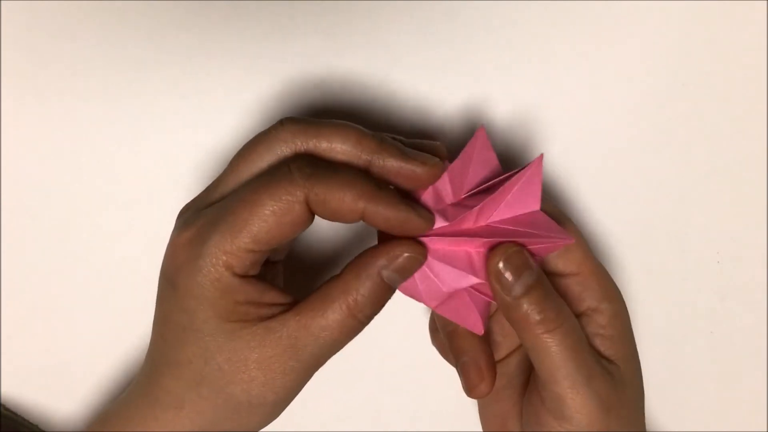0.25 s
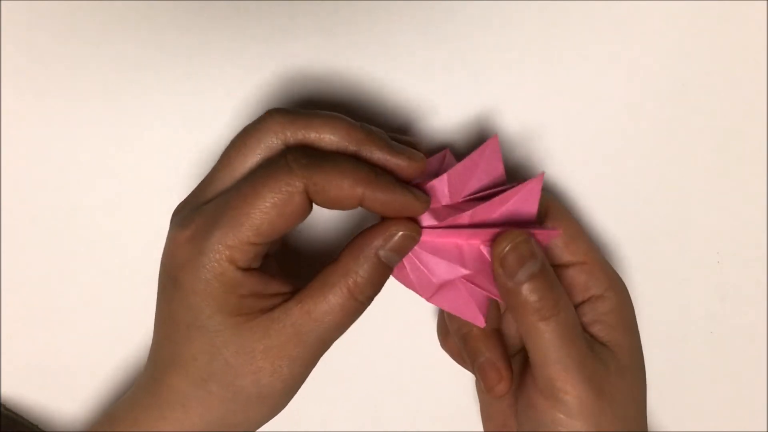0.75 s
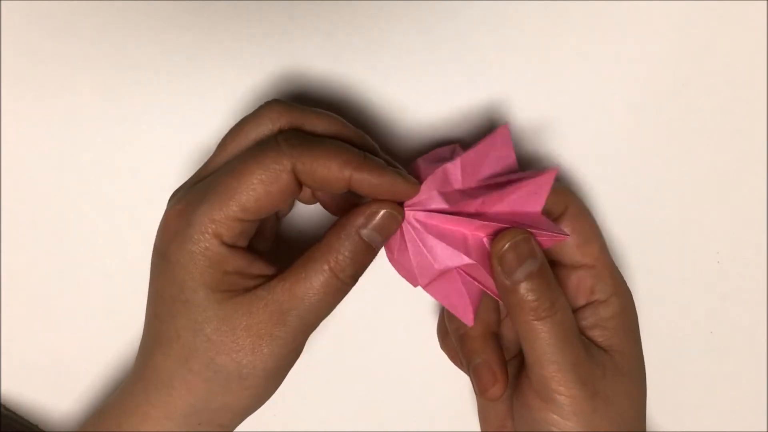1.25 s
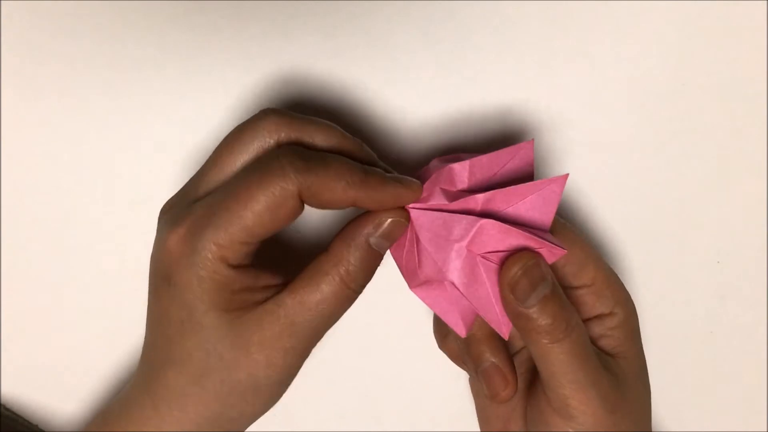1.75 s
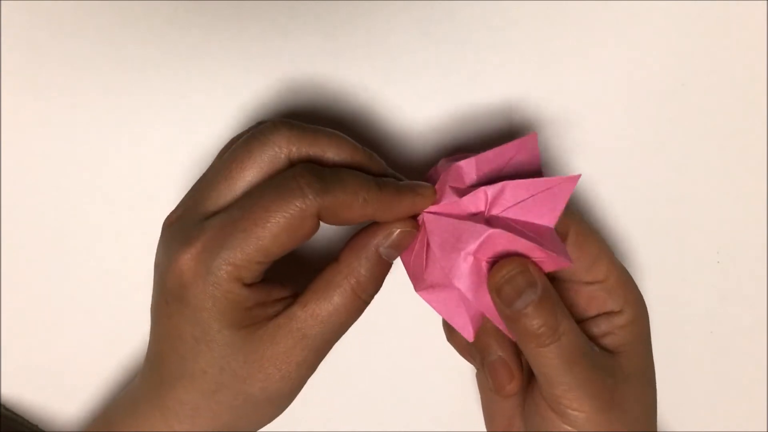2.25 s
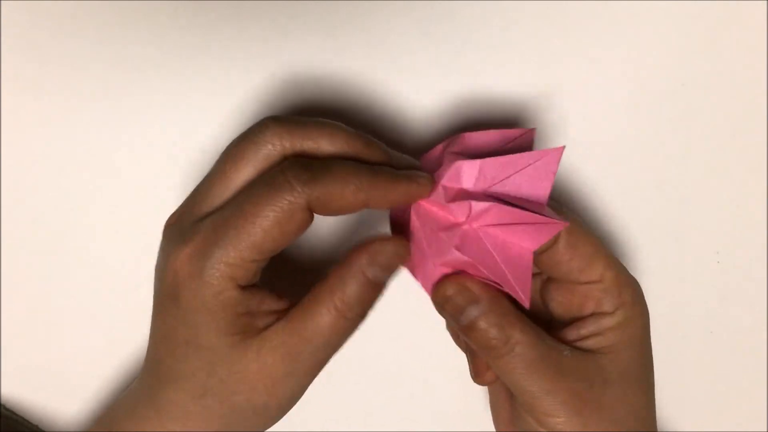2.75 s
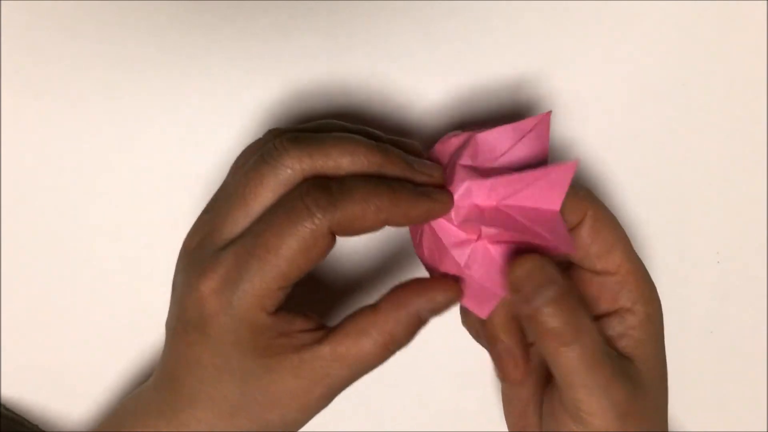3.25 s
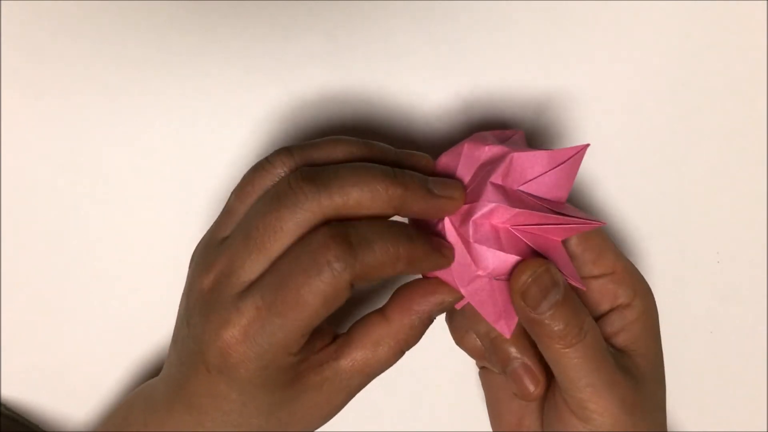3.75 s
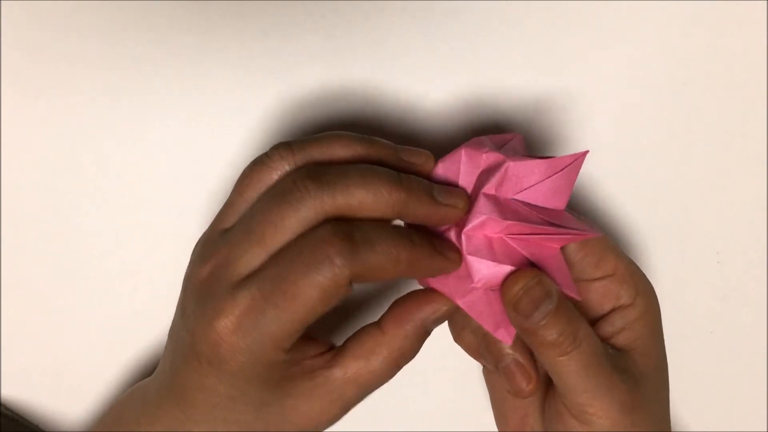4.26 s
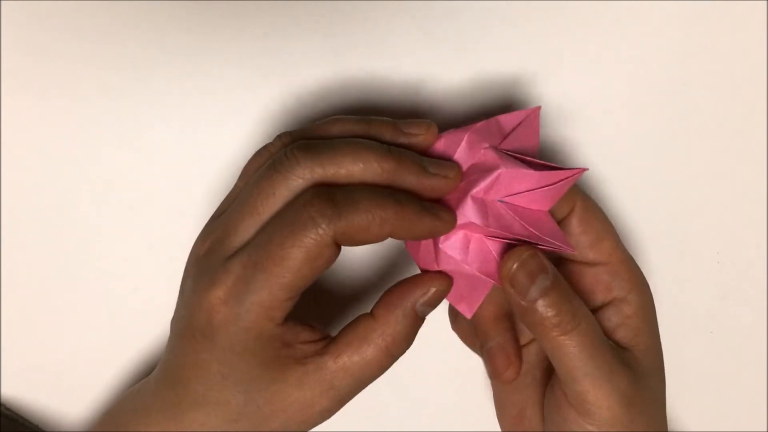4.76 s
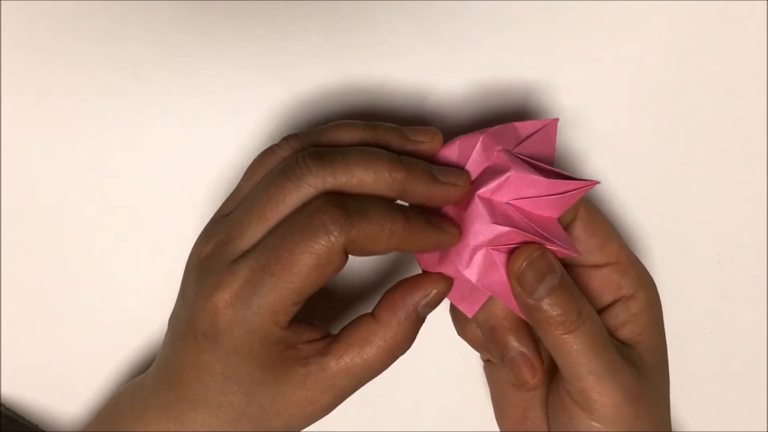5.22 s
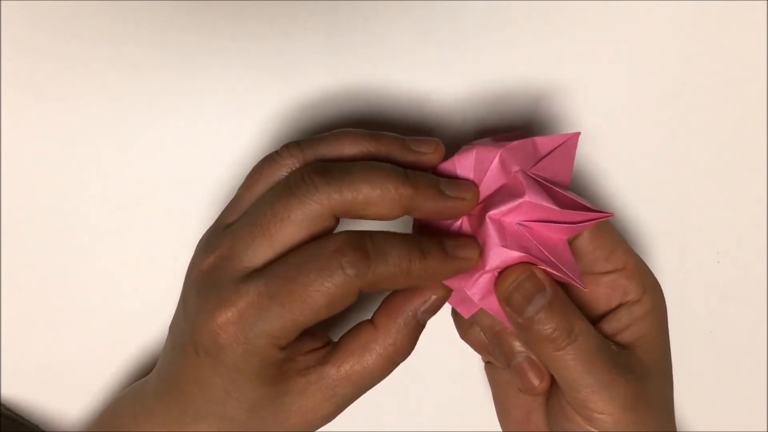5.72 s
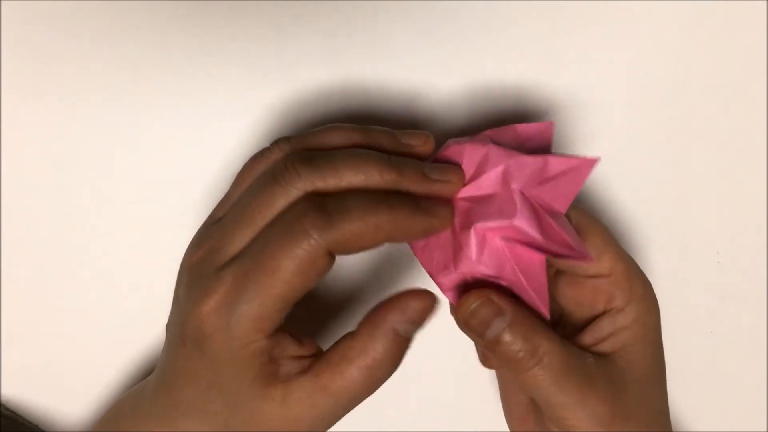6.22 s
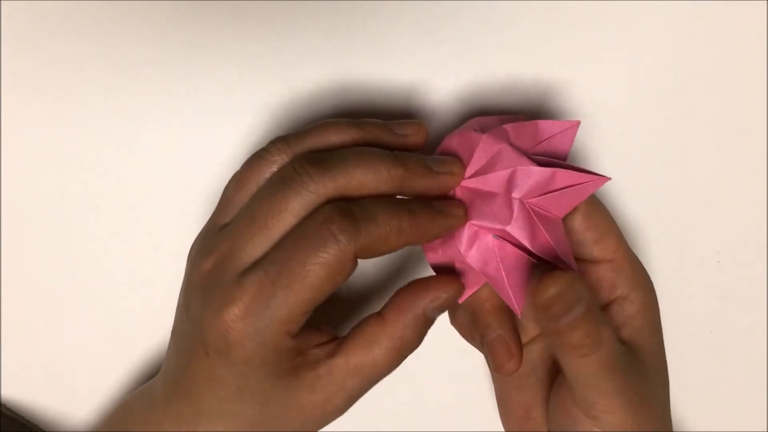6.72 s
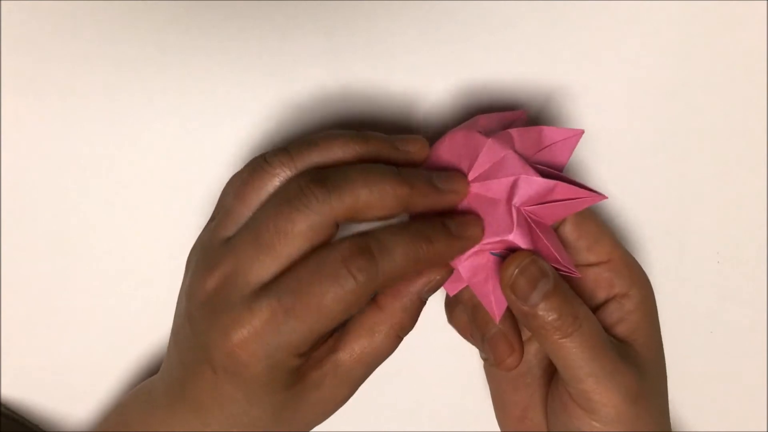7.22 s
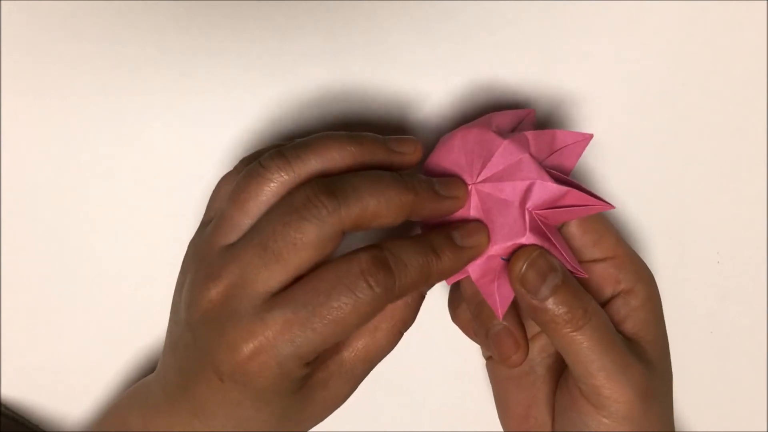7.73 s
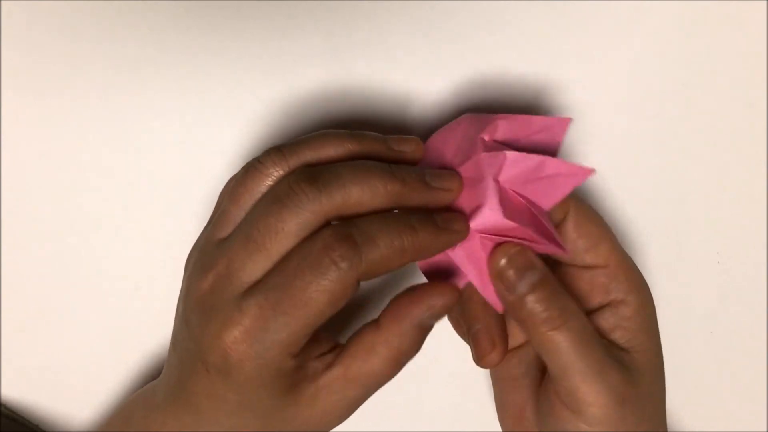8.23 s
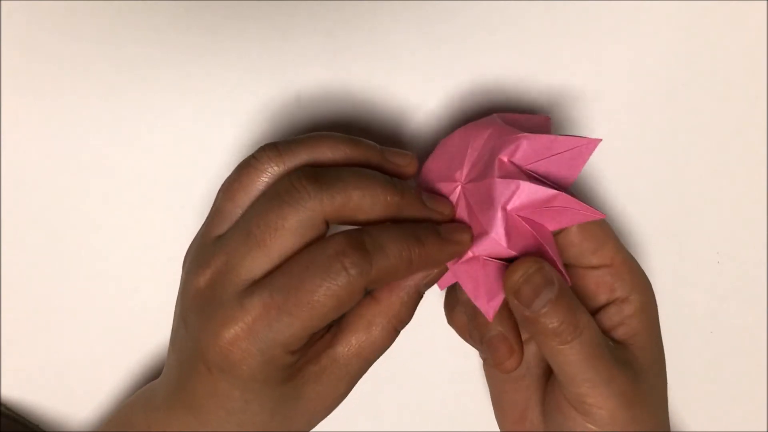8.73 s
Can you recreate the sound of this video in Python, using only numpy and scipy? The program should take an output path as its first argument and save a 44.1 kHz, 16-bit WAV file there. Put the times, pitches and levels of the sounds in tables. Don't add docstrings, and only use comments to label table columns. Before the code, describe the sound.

Crisp paper crackling and short grainy rubs as hands work a little stiff origami piece indoors, over very faint room air and hiss.

```python
import sys
import numpy as np
from scipy import signal
from scipy.fft import rfft, irfft, next_fast_len
from scipy.io import wavfile
from scipy.ndimage import uniform_filter1d, map_coordinates

SR = 44100
rng = np.random.default_rng(int(sys.argv[2]) if len(sys.argv) > 2 else 0)


def inscribe(sig):
    pcm = np.round(np.clip(np.atleast_2d(sig).T, -1, 1) * 32767)
    wavfile.write(sys.argv[1], SR, pcm.astype(np.int16))


def undo_db(level):
    steps = np.asarray(level, float) / 20
    return 10 ** steps


N = 396018

# pitch_hz, width_hz, level_db
FLAP_TONES = [(2176, 245, 8.5), (2706, 480, 3.5)]


def unit(x):
    return x / np.sqrt(np.mean(x ** 2) + 1e-20)


def peak_one(rows):
    return rows / np.abs(rows).max(axis=1, keepdims=True)


def along(points, hz):
    f, v = np.transpose(points)
    return np.interp(np.log(hz + 1), np.log(f + 1), v)


def filtered(x, response):
    m = next_fast_len(N + SR // 4)
    hz = np.fft.rfftfreq(m, 1 / SR)
    return irfft(rfft(x, m) * response(hz), m)[..., :N]


def resonances(modes):
    def one(f, centre, width):
        return 1j * f * width / (centre * centre - f * f + 1j * f * width)

    def response(f):
        total = 0
        for k, (centre, width, db) in enumerate(modes):
            total = total + (-1) ** k * undo_db(db) * one(f, centre, width) * one(f, centre, 3 * width)
        return total

    return response


def wobble(rate):
    points = rng.standard_normal(int(N * rate / SR) + 4)
    return map_coordinates(points, [np.arange(N) * rate / SR])


def creases():
    # start_s, pocket_pitch_hz, pocket_db, flap_db, crack_db
    loose_snaps = [(0.3385, 1085, -17, -19, -33), (1.0895, 1060, -29.5, -37, -26.5),
                   (1.337, 1150, -38, -50, -23.5), (1.3615, 1000, -52, -31.5, -53),
                   (1.7378, 1090, -32.5, -25.5, -39), (1.7573, 1580, -31, -22, -66),
                   (2.534, 1600, -51, -34, -32), (3.0688, 1395, -25.5, -21.5, -33.5),
                   (3.2317, 746, -33.5, -64, -62), (3.4534, 1170, -33, -24.5, -23),
                   (4.0537, 1670, -42, -33.5, -33.5), (4.7937, 800, -42, -33, -37),
                   (4.9109, 1020, -51, -37, -30), (5.1217, 1220, -32, -31.5, -31.5),
                   (5.6218, 700, -25.5, -68, -55), (8.1645, 1150, -34.5, -22.5, -22.5),
                   (8.6369, 1830, -65, -23, -20), (8.9346, 1590, -47, -40, -31.5)]
    # start_s, pocket_pitch_hz, pocket_db, flap_db, crack_db
    tight_snaps = [
        (2.2003, 1317, -22.5, -12.5, -13),
        (3.0104, 1240, -49, -29, -31),
        (6.3074, 944, -32, -30, -28.5),
        (6.4063, 918, -21, -14.5, -11),
        (7.8026, 1160, -25, -29.5, -20.5),
        (8.1187, 990, -29.5, -47, -26.5),
    ]
    # start_s, level_db
    dents = [(.2087, -49), (.4486, -44), (1.1118, -35), (1.3444, -39), (1.419, -35.5), (1.8198, -37),
             (2.4015, -38), (3.2415, -40), (3.2495, -41), (3.5357, -49), (3.7916, -39.5), (4.5744, -41),
             (4.6086, -45.5), (4.6753, -42), (5.2847, -44), (6.477, -44), (6.4905, -39), (6.5983, -45.5),
             (6.9779, -43), (7.2982, -44.5), (7.3197, -50.5), (8.2143, -48.5), (8.6209, -47.5),
             (8.9041, -39.5)]
    # start_s, level_db
    flicks = [(.5687, -42), (.5871, -51), (.6117, -38), (.621, -44), (1.2483, -36.5), (2.2125, -40),
              (2.3743, -38), (2.3895, -41), (2.647, -43.5), (3.479, -30), (3.7819, -29.5), (4.0684, -36),
              (4.1279, -41), (5.2517, -33.5), (5.2689, -38), (6.063, -32), (6.4237, -35), (6.4985, -28.5),
              (7.3912, -43), (7.4373, -44), (7.5491, -48), (8.0505, -42), (8.6499, -48)]
    # start_s, level_db
    splits = [(.4816, -36), (1.4737, -42.5), (1.4919, -33.5), (2.1914, -36), (3.0184, -33), (3.6627, -46.5),
              (4.862, -34.5), (5.101, -29.5), (5.5876, -39.5), (6.095, -34.5), (6.1063, -27), (6.6669, -58),
              (7.0028, -33), (7.064, -39), (7.1278, -32), (8.6012, -38)]
    kinds = [(dents, 1036, 1, -5.5, -17), (flicks, 1313, -11.5, -3.5, -10.5),
             (splits, 1161, -15, -10, -2.5)]
    ticks = np.array([(s, hz, db + pocket_db, db + flap_db, db + crack_db)
                      for rows, hz, pocket_db, flap_db, crack_db in kinds for s, db in rows])
    ticks[:, 1] *= np.exp(.15 * rng.standard_normal(len(ticks)))
    rows = np.vstack([tight_snaps, loose_snaps, ticks])
    tight = np.arange(len(rows)) < len(tight_snaps)
    return np.c_[rows, tight]


def snaps():
    # pitch_hz, level_db
    crack_tone = [(2500, -16.5), (3500, 5), (4500, 9), (5100, -2), (6200, 5.5), (8500, -4.5), (12000, -11),
                  (16000, -15.5)]
    s, pocket_hz, pocket_db, flap_db, crack_db, tight = creases().T[:, :, None]
    octaves = np.where(tight, .33, -.35 * np.log2(pocket_hz / 1200))
    crack_hz = 5100 * 2 ** octaves
    t = np.arange(SR // 50) / SR
    chance = rng.standard_normal((len(s), 4 + len(t)))

    def ring(hz, t60):
        return np.sin(2 * np.pi * hz * t) * undo_db(-60 * t / t60) * (1 - np.exp(-t / .0002))

    pocket = peak_one(ring(pocket_hz, .013) + .7 * ring(1.42 * pocket_hz, .009))

    bending = 0
    for k, (hz, _, db) in enumerate(FLAP_TONES):
        strength = undo_db(db + 3 * chance[:, [k]])
        bending = bending + strength * ring(hz * (1 + .05 * chance[:, [k + 2]]), .007)
    flaps = peak_one(np.gradient(bending, axis=1))

    first_break = 3.2 * (np.arange(len(t)) == 8)
    tear = (chance[:, 4:] + first_break) * undo_db(-60 * t / .006) * (1 - np.exp(-t / .0001))
    hz = np.fft.rfftfreq(len(t), 1 / SR)
    tilt_db = 20 * np.log2(crack_hz / 5600) * np.log2(hz / 5600 + .01)
    colour = undo_db(along(crack_tone, hz) + tilt_db * (hz > 3000))
    crack = peak_one(irfft(rfft(tear) * colour, len(t)) * (t < .01))

    rows = undo_db(pocket_db + 0.5) * pocket + undo_db(flap_db - 0.5) * flaps + undo_db(crack_db - 0.5) * crack
    at = np.round(s * SR).astype(int) + np.arange(len(t))
    return np.bincount(at.ravel(), rows.ravel(), N + SR)[:N]


def patchy(x, patchy_db):
    z = signal.stft(x, nperseg=512)[2]

    def patches(pitch_bins, steps):
        spread = uniform_filter1d(rng.standard_normal(z.shape), pitch_bins, axis=0)
        return unit(uniform_filter1d(spread, steps, axis=1))

    gain = undo_db(patchy_db * (patches(3, 14) + patches(20, 10)))
    return signal.istft(z * gain, nperseg=512)[1][:N]


def slides(t):
    # start_s, length_s, drag_db, pocket_db, fibre_db
    held_slides = [
        (.482, 0.074, -54, -5.5, 6),
        (0.537, 0.1, -53.5, -8, -6.5),
        (1.315, 0.044, -48, 1.5, 2.5),
        (3.169, 0.071, -61.5, -4.5, -2.5),
        (3.227, 0.033, -64, 9.5, -14),
        (3.346, 0.042, -52, -3, 0),
        (4.42, 0.04, -54.5, 6, 4.5),
        (5.684, 0.043, -50, -6, 0),
        (5.757, 0.023, -50.5, -2.5, -6.5),
        (8.6, 0.024, -61.5, 1.5, 0),
    ]
    on_s, off_s, sag_db = .005, .008, 2.5
    s, length, drag_db, pocket_db, fibre_db = np.transpose(held_slides)[:, :, None]
    landing = np.clip((t - s) / on_s, 0, 1)
    lifting = np.clip((s + length - t) / off_s + .5, 0, 1)
    fading = undo_db(drag_db - sag_db * np.clip((t - s) / length, 0, 1))
    held = landing * lifting * fading
    balance = undo_db(np.hstack([0 * s, pocket_db, fibre_db]).T)
    return balance ** 2 @ held ** 2


def pressure(edge_db):
    # crest_s, length_s, drag_db, dryness_db
    grips = [(.067, 0.12, -52, 5.5), (.47, 0.072, -57, -2.5), (.904, .042, -81, -15.5),
             (1.338, 0.065, -50, -2.5), (1.414, 0.042, -47.5, 0), (1.536, 0.059, -45.5, -0.5),
             (2.525, 0.091, -52, 1.5), (3.078, 0.031, -57, -3), (3.445, 0.059, -48, 1.5),
             (3.777, 0.098, -56.5, 2.5), (4.053, 0.052, -65, 1), (4.576, 0.11, -53, 1),
             (4.912, 0.016, -46.5, -3), (5.306, 0.2, -63, -2), (6.3, .05, -46.5, 0.5), (6.6, 0.077, -53, 2),
             (6.681, 0.1, -62, 1.5), (7.068, 0.039, -54, 1), (7.391, 0.021, -60, -5.5),
             (7.663, 0.044, -56.5, 3.5), (7.813, 0.043, -65, 9), (8.074, 0.024, -69, 9),
             (8.174, 0.05, -55.5, 3.5)]
    # crest_s, length_s, drag_db, dryness_db
    rubs = [(.355, 0.13, -55, 1), (1.096, 0.051, -45.5, 0.5), (1.743, .068, -61, -7.5),
            (1.932, 0.048, -49.5, 0), (2.154, .024, -61, -1), (2.228, 0.083, -53, 2),
            (2.791, .064, -54.5, 2.5), (2.893, 0.056, -44, 0.5), (3.661, 0.025, -53, 4),
            (4.693, 0.1, -52, -2.5), (5.103, .063, -56, 1), (5.596, 0.069, -54.5, -1),
            (6.069, 0.057, -50.5, -2), (6.103, 0.033, -48.5, 0), (6.414, 0.068, -49, -1),
            (6.525, 0.088, -54, -0.5), (6.777, 0.059, -62, -1.5), (7.008, 0.019, -55, -2),
            (7.301, 0.024, -59, 0), (7.346, 0.074, -60.5, 3), (7.552, 0.075, -63.5, -4.5),
            (7.747, 0.1, -65, 0), (8.13, 0.093, -54.5, 2), (8.454, 0.091, -55.5, 1.5)]
    # crest_s, length_s, drag_db, dryness_db
    pushes = [(1.043, 0.21, -63.5, -3), (1.251, 0.065, -52, 0.5), (1.823, 0.018, -77, -8),
              (2.456, .08, -48.5, -0.5), (3.025, 0.12, -45.5, 1.5), (3.624, 0.069, -59.5, -2),
              (4.196, 0.046, -66, 2), (4.274, 0.049, -67, -3), (4.808, 0.049, -61, -1),
              (4.855, 0.052, -61.5, 6), (6.984, 0.038, -58, -5), (7.138, 0.093, -64.5, -9),
              (7.446, 0.06, -60, -0.5), (8.054, 0.068, -59, 0), (8.312, 0.065, -59.5, 2.5),
              (8.394, 0.12, -61, -3.5), (8.68, 0.1, -58.5, 3.5), (8.918, 0.089, -59.5, -0.5)]
    # time_s, level_db
    handling = [(0.0, -67), (.7, -67.5), (.85, -71), (1.1, -66.5), (2.8, -71), (2.95, -65), (4.43, -72.5),
                (4.63, -65), (5.6, -69), (5.901, -70), (6.2, -65.5), (6.55, -55.5), (6.8, -73), (8.4, -70),
                (8.98, -65)]
    kinds = [(grips, .25, 1.7, 1.27), (rubs, .54, 1.48, 1.4), (pushes, .8, 1.77, 2.1)]
    t = np.arange(N) / SR
    power = slides(t)
    for rows, share, rise_edge, fall_edge in kinds:
        for crest, length, drag_db, dry_db in rows:
            rise, fall = share * length, (1 - share) * length
            near = slice(max(0, round((crest - 2 * rise) * SR)), round((crest + 2 * fall) * SR))
            since = t[near] - crest
            rising = np.abs(since / rise) ** rise_edge
            falling = np.abs(since / fall) ** fall_edge
            away = np.where(since < 0, rising, falling)
            colour_db = np.array([[0], [-0.25 - dry_db], [-2.84 + dry_db]])
            power[:, near] += undo_db(edge_db * away + drag_db + colour_db) ** 2
    s, db = np.transpose(handling)
    shifting = undo_db(np.interp(t, s, db) + np.array([[-6], [-6], [-8]]))
    return np.sqrt(power + shifting ** 2)


def strokes():
    # pitch_hz, width_hz, level_db
    pocket_tones = [(964, 517, 8.5), (1560, 1740, 1)]
    # pitch_hz, level_db
    grain_tone = [(2500, -28), (3600, 2.5), (4500, -2), (5100, -2), (6200, 0), (8000, -7), (10500, -13.5),
                  (13000, -15.5), (16000, -15.5)]
    drag, hollow, dry = pressure(edge_db=-14.5)
    clumps = undo_db(1.2 * wobble(60) + 1.8 * wobble(300))
    slip_now = rng.random(N) < 1500 / SR
    slip_size = undo_db(2.5 * np.minimum(rng.exponential(size=N), 4))
    slips = slip_now * slip_size * rng.choice([-1, 1], N)
    drive = unit(clumps * (rng.standard_normal(N) + 0.79 * unit(slips)))
    drive = patchy(drive, patchy_db=2.7)
    pocket = hollow * unit(filtered(drive, resonances(pocket_tones)))
    flaps = drag * unit(filtered(drive, resonances(FLAP_TONES)))
    fibres = dry * unit(filtered(drive, lambda hz: undo_db(along(grain_tone, hz))))
    return undo_db(1.0) * pocket + undo_db(-0.36) * flaps + undo_db(-2.23) * fibres


def bumps():
    # pitch_hz, width_hz, level_db
    bump_tones = [(109, 100, -3), (346, 240, 2.5)]
    swell = undo_db(-83 + 7.5 * wobble(5.1))
    return swell * unit(filtered(rng.standard_normal(N), resonances(bump_tones)))


def table(x):
    # delay_s, level_db
    close_echoes = [(.0021, -11), (.0034, -20)]
    total = x
    for s, db in close_echoes:
        total = total + undo_db(db) * np.pad(x, (round(s * SR), 0))[:N]
    return total


def walls(x, delay_s):
    # pitch_hz, time_to_fall_60_db_s
    ring_times = [(300, 0.31), (1000, 0.11), (3000, 0.19), (8000, 0.064), (16000, 0.092)]
    hz, t, z = signal.stft(rng.standard_normal(SR // 2), SR, nperseg=128)
    decay = undo_db(-60 * t / along(ring_times, hz)[:, None])
    tail = signal.istft(z * decay, SR, nperseg=128)[1]
    tail = np.pad(tail / np.linalg.norm(tail), (round(delay_s * SR), 0))
    return signal.fftconvolve(x, tail)[:N]


def hush():
    # pitch_hz, level_db_per_hz
    air_tone = [(15, -35), (25, -15), (65, 6), (163, 0.5), (220, 3.5), (568, -3), (927, -6), (1780, -9),
                (2820, -24), (4860, -17), (6210, -18.5), (10400, -20.5), (14800, -20), (16500, -35)]
    # pitch_hz, width_hz, level_db
    drone_tones = [(214, 22, -4), (239.6, 16, -9)]
    # time_s, level_db
    drone_swell = [(5.15, 2), (5.3, 16.5), (5.6, 4.5), (6.6, 0.5), (7.2, -3), (8.9, 2)]
    air = unit(filtered(rng.standard_normal(N), lambda hz: undo_db(along(air_tone, hz))))
    hum = unit(filtered(rng.standard_normal(N), resonances(drone_tones)))
    swell_db = np.interp(np.arange(N) / SR, *np.transpose(drone_swell))
    drone = hum * undo_db(4.0 * wobble(9) + swell_db)
    return undo_db(-68.5 - 1.27) * air + undo_db(-81) * drone


def scene():
    small = signal.butter(4, 480, "highpass", fs=SR, output="sos")
    crackle, rustle = signal.sosfilt(small, [table(snaps()), strokes()])
    room = walls(undo_db(-17) * crackle + undo_db(-15) * rustle, delay_s=0.0096)
    return (crackle + rustle + room + hush() + bumps())[None]


def starve(x):
    thin_moments = [.81, .88, .986, 1.269, 1.498, 1.647, 1.67, 2.009, 2.074, 2.498, 3.718, 4.59, 4.743,
                    5.231, 5.274, 5.422, 5.87, 5.958, 6.344, 6.6, 6.915, 7.259, 7.643, 7.71, 7.921, 8.026,
                    8.387, 8.539, 8.686, 8.751]
    hz, _, z = signal.stft(x, SR, nperseg=1024)
    size = np.abs(z)
    bar = 1.15 * size[(hz > 3000) & (hz < 6000)].mean(axis=0)
    treble_gain = np.where(size > bar, 1.4, .15)
    gain = np.where(hz[:, None] < 2500, 1, treble_gain)
    thin = signal.istft(gain * z, SR, nperseg=1024)[1][:N]
    gap = np.abs(np.arange(N) / SR - np.array(thin_moments)[:, None])
    share = np.clip(np.clip(1.5 - gap / .009, 0, 1).sum(axis=0), 0, 1)
    return x + share * (thin - x)


def band_limit(x):
    return signal.sosfilt(signal.butter(12, 16840, fs=SR, output="sos"), x)


def record(dry):
    limit = [(15750, 0), (15850, -22), (16400, -24), (16700, -60)]  # (Hz, dB)
    band = filtered(dry[0], lambda hz: undo_db(along(limit, hz)))
    mix = starve(band)[None]
    return band_limit(mix)


dry = scene()
out = record(dry)
inscribe(out)
```